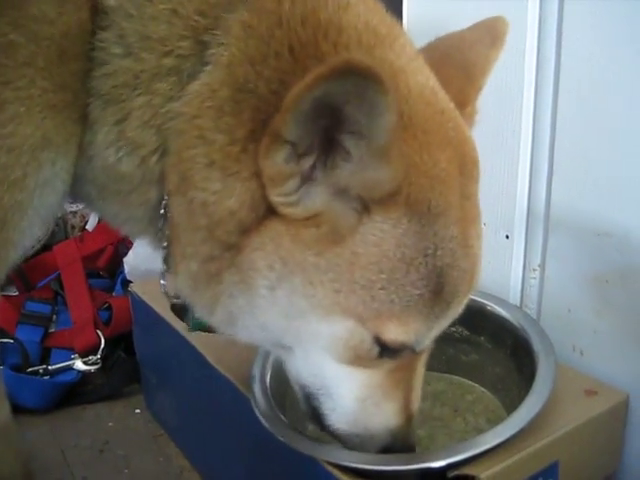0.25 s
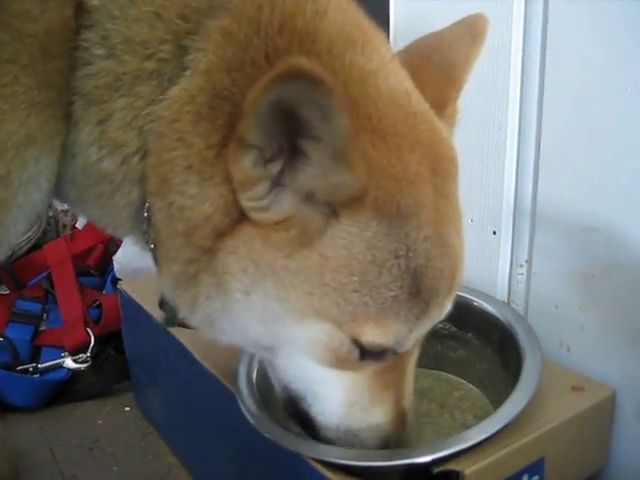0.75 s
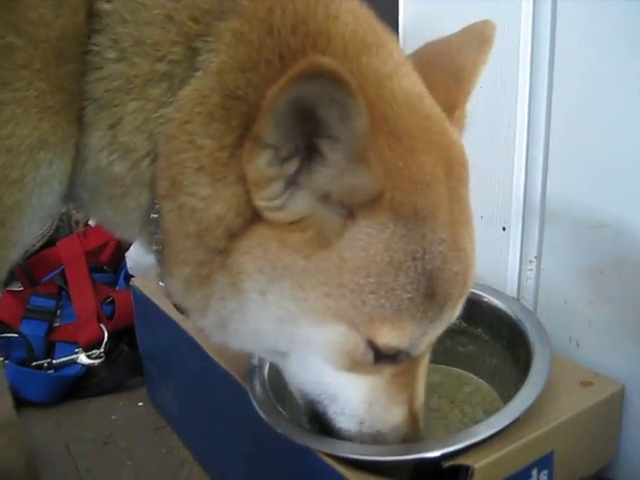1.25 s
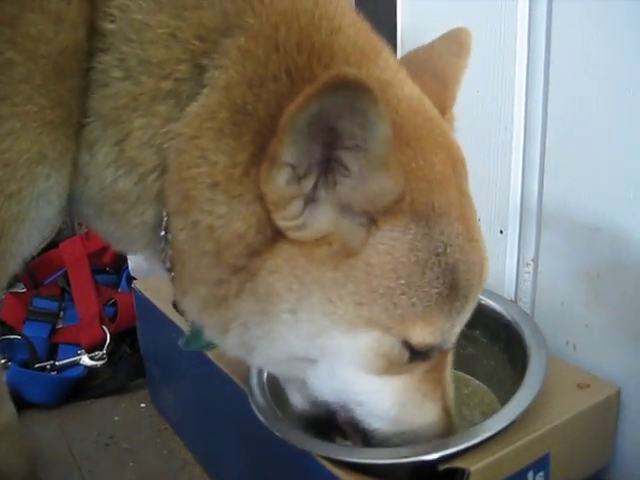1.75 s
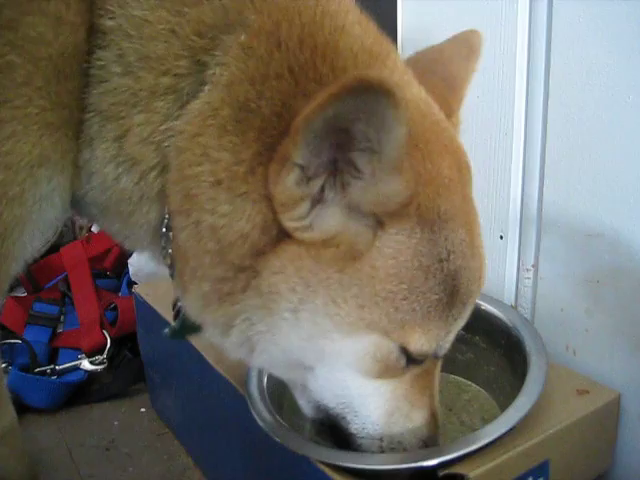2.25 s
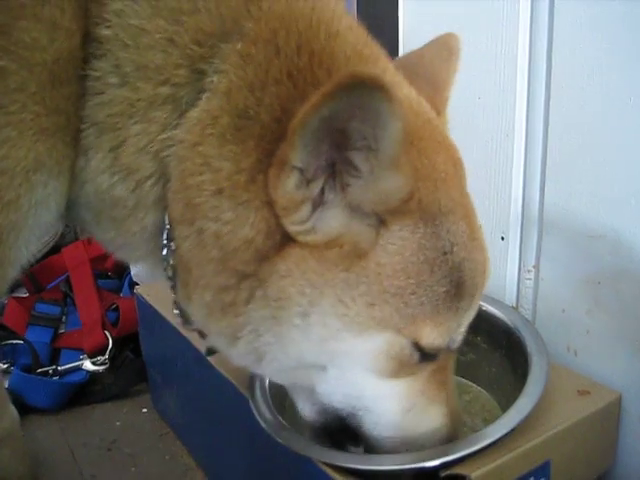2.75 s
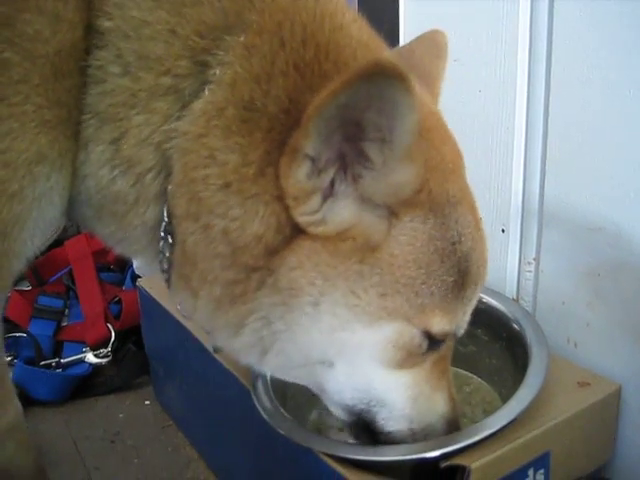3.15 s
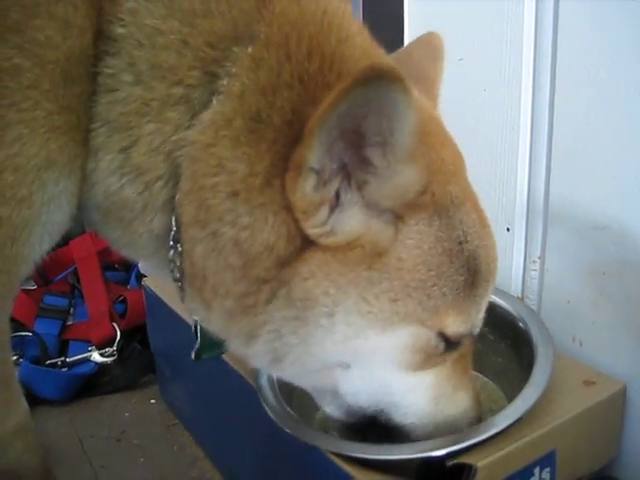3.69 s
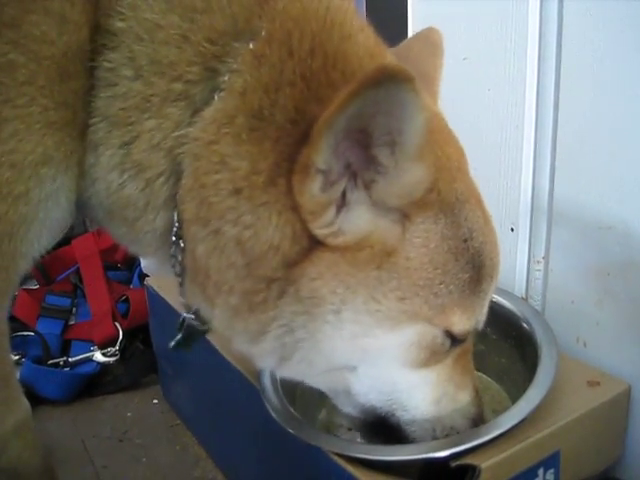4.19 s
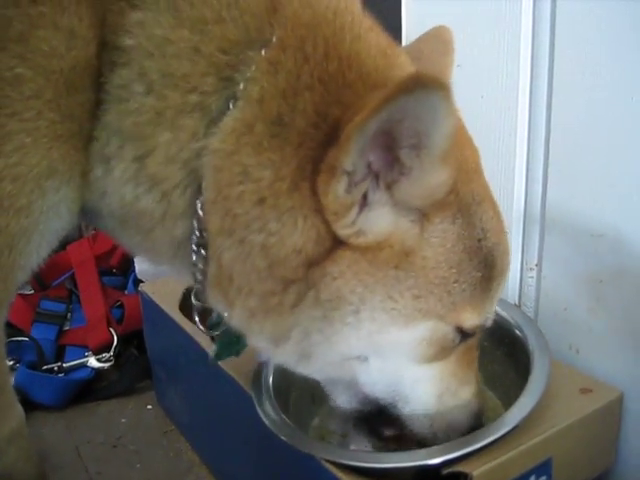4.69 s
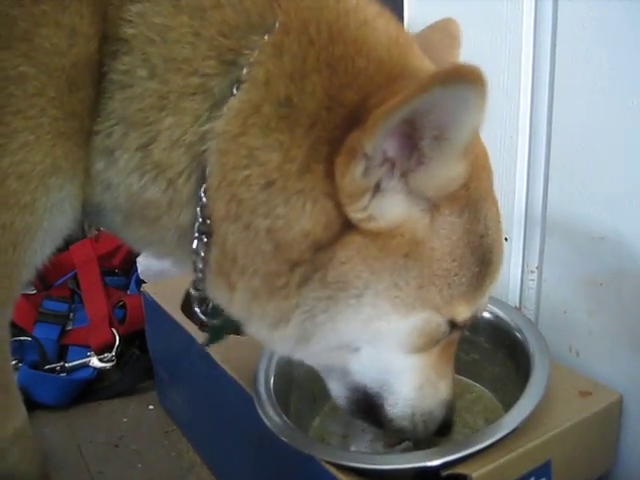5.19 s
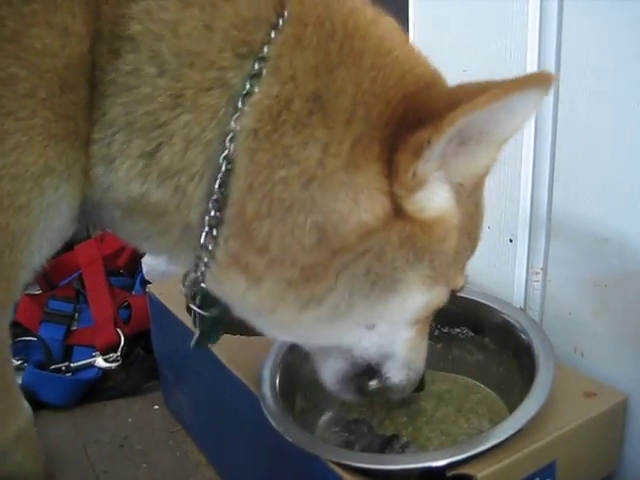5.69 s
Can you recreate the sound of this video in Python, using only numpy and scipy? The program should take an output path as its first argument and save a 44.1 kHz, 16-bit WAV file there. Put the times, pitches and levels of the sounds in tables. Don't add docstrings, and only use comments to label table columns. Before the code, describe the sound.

Steady wet lapping and sticky tongue smacks begin at once, with tiny bubbles crackling between them. High, thin tag clinks and chain snaps are busiest in the first couple of seconds and continue between laps. Soft muzzle knocks and dull bowl thuds sit low. Near the end the lapping thins to small sticky snaps and a last bright clink. Close, dry indoor sound with microphone hiss.

```python
import sys
import numpy as np
from scipy import signal
from scipy.fft import rfft, irfft
from scipy.io import wavfile
from scipy.ndimage import uniform_filter1d

SR = 44100
rng = np.random.default_rng(int(sys.argv[2]) if len(sys.argv) > 2 else 0)


def transcribe(signal):
    frames = np.atleast_2d(signal).T
    limited = np.clip(frames, -1, 1)
    pcm = np.round(limited * 32767).astype(np.int16)
    wavfile.write(sys.argv[1], SR, pcm)


def gain_from_decibels(decibels):
    exponent = np.asarray(decibels, float) / 20
    return 10 ** exponent


N = 261937


def rms_one(x):
    return x / np.sqrt(np.mean(x ** 2) + 1e-20)


def band(x, low_hz, high_hz):
    return signal.sosfilt(signal.butter(2, [low_hz, high_hz], "band", fs=SR, output="sos"), x)


def resonance(x, hz, width_hz):
    r = np.exp(-np.pi * width_hz / SR)
    feedback = [1, -2 * r * np.cos(2 * np.pi * hz / SR), r * r]
    return signal.lfilter(np.array([1, 0, -1]) * (1 - r * r) / 2, feedback, x)


def dying(t, t60, rise):
    return (1 - np.exp(-t / rise)) * gain_from_decibels(-60 * t / t60)


def seconds(length_s):
    return np.arange(int(length_s * SR)) / SR


def tone(hz, t):
    return np.sin(2 * np.pi * hz * t)


def add(out, s, x):
    at = min(max(round(s * SR), 0), len(out))
    out[at:at + len(x)] += x[:len(out) - at]


def grains(per_s, spread_db):
    sizes = gain_from_decibels(spread_db * np.minimum(rng.exponential(1, N), 4)) * rng.choice([-1, 1], N)
    return sizes * (rng.random(N) < per_s / SR) + 1e-18


def swarm(per_s, spread_db, low_hz, high_hz, cycles, count):
    born, dealt = grains(per_s, spread_db), rng.integers(0, count, N)
    pitches = np.geomspace(low_hz, high_hz, count)
    return rms_one(sum(resonance(born * (dealt == k), hz, hz / cycles) for k, hz in enumerate(pitches)))


def bursts(rows, gain_db, cycles, noisy):
    out, t = np.zeros(N), seconds(1 / 16)
    for s, db, hz in rows:
        rise, white = 0.00031 + 0.6 / hz, rng.standard_normal(len(t))
        colour = rms_one(resonance(resonance(white, hz, 0.3 * hz), hz, 0.3 * hz))
        wave = np.sin(2 * np.pi * hz * t + white[0]) + noisy * colour
        add(out, s - 1.3 * rise, gain_from_decibels(db + gain_db) * wave * dying(t, 0.0047 + cycles / hz, rise))
    return out


# (frequency [Hz], density [dB per Hz])
FLOOR_SPECTRUM = [(12, -33), (20, -7.5), (191, 3.5), (511, 0.5), (977, 2.5), (1330, -1.5), (5300, -13),
                  (7860, -16.5), (9050, -13), (12700, -17), (15500, -18), (16800, -47)]
# (frequency [Hz], rms level [dB])
HUM_LINES = [(59.5, -75), (120, -73.5), (990.5, -66)]


def room_floor():
    hz = np.fft.rfftfreq(N, 1 / SR) + 1
    corner_hz, density_db = np.transpose(FLOOR_SPECTRUM)
    shape = gain_from_decibels(np.interp(np.log(hz), np.log(corner_hz), density_db))
    hiss = rms_one(irfft(rfft(rng.standard_normal(N)) * shape, N))
    t = np.arange(N) / SR
    lines = sum(np.sqrt(2) * gain_from_decibels(db) * tone(line_hz, t) for line_hz, db in HUM_LINES)
    return gain_from_decibels(-54.5) * hiss + lines


# (time [s], peak level [dB], pitch [Hz], fall to half [ms])
TONGUE_POCKETS = [(0.1262, -27.5, 1920, 2.1), (0.2587, -28.5, 1800, 1.6), (0.5243, -22, 1690, 1.6),
                  (0.5281, -21.5, 1740, 1.4), (0.5343, -46, 1760, 1), (0.6054, -27.5, 1890, 1.8),
                  (0.6642, -27.5, 1660, 0.95), (0.9438, -29, 1880, 0.65), (0.9474, -31, 1860, 1.1),
                  (0.9609, -28.5, 1770, 1.7), (1.2838, -29, 1690, 0.83), (1.5514, -31.5, 2320, 1.1),
                  (1.5599, -28.5, 1600, 1.1), (1.6502, -30, 1830, 2), (1.8551, -20, 1850, 2.3),
                  (1.8811, -25.5, 1650, 0.66), (1.8845, -31.0, 1690, 1), (2.1679, -22, 1910, 1.9),
                  (2.1861, -27.5, 1670, 0.9), (2.4778, -26.5, 1800, 1.8), (2.4814, -38, 1710, 1),
                  (2.4946, -22, 1640, 1.2), (2.4984, -39, 1720, 0.7), (2.5124, -22, 1860, 0.85),
                  (2.516, -27, 1730, 0.91), (2.8679, -30, 2020, 0.55), (2.8752, -23.5, 1600, 0.85),
                  (2.8784, -39, 1920, 0.7), (2.8937, -23.5, 1900, 0.7), (2.9186, -33.5, 1850, 1.6),
                  (3.1726, -28.0, 1870, 1.7), (3.5011, -27.5, 1750, 1), (3.804, -23.5, 1690, 1.4),
                  (3.8127, -28.5, 1500, 0.6), (4.0919, -23, 2210, 0.49), (4.1029, -26.5, 1600, 0.94),
                  (4.1126, -26.5, 1760, 1.2), (4.431, -24.5, 1560, 0.8), (4.9343, -22.5, 1660, 1.6),
                  (4.9428, -34, 1780, 2.2), (5.2315, -24.5, 1730, 0.35), (5.4515, -29, 1910, 1)]
# (time [s], peak level [dB], pitch [Hz])
LIP_POCKETS = [(0.1227, -24, 3050), (0.1267, -34, 3260), (0.225, -25, 3280), (0.527, -36, 3190),
               (0.5313, -31, 3500), (0.536, -27, 3500), (0.6339, -15.5, 3190), (0.6476, -28, 3240),
               (0.6643, -24.5, 3440), (0.827, -22.5, 3340), (0.9474, -21, 3400), (1.2353, -20, 3360),
               (1.2387, -26.5, 2970), (1.2522, -28.5, 3230), (1.283, -25, 3150), (1.437, -27, 2800),
               (1.549, -30, 3280), (1.5551, -25.5, 3000), (1.8555, -22, 3500), (1.861, -38, 3400),
               (1.869, -28, 3130), (1.8809, -29, 3360), (2.1667, -29, 3350), (2.171, -34, 3400),
               (2.1866, -27, 3300), (2.394, -25, 3250), (2.495, -29.0, 2830), (2.5125, -29, 2670),
               (2.7598, -31, 2740), (2.874, -28, 3110), (2.8945, -41, 2980), (2.9185, -32.5, 3160),
               (2.9617, -27, 3370), (3.1743, -25, 3370), (3.473, -30, 3200), (3.476, -28, 3140),
               (3.4827, -30, 3090), (3.6817, -30, 3150), (4.0915, -38, 3160), (4.105, -30, 2800),
               (4.312, -31, 3140), (4.4308, -25, 3430), (4.4442, -33, 3440), (5.126, -28.5, 3180),
               (5.3449, -31, 3540)]
# (time [s], level [dB], pitch
# [Hz])
TIP_POCKETS = [(0.3177, -37, 5500), (0.5318, -21.5, 4260), (0.5606, -32, 6270), (0.6331, -23, 4890),
               (0.7443, -24.5, 6140), (0.824, -23.5, 5000), (0.832, -26.5, 5260), (0.9472, -24, 4980),
               (0.953, -33, 4800), (1.0175, -36, 5260), (1.2362, -27, 4030), (1.547, -24, 4230),
               (1.551, -26.5, 5020), (1.6599, -28, 5430), (1.7356, -29.5, 5400), (1.8546, -26, 4840),
               (1.8809, -16, 4120), (2.167, -27.5, 4240), (2.2837, -32, 4750), (2.3657, -26.5, 5120),
               (2.3958, -31, 4300), (2.496, -30, 4330), (2.5147, -30, 4260), (2.5966, -32.5, 5300),
               (2.761, -26, 4480), (2.8677, -28, 5400), (2.8757, -32, 4530), (2.891, -30, 4200),
               (3.1334, -27.5, 4200), (3.1716, -27.5, 5740), (3.6886, -25.5, 6300), (4.0916, -32, 5600),
               (4.3112, -13.5, 4470), (4.9211, -21, 5800), (5.347, -25, 4770)]
# (time [s], level [dB], pitch [Hz])
DEEP_POCKETS = [(0.6064, -31, 797), (0.6205, -41, 840), (0.6333, -37, 880), (1.1636, -31.5, 970),
                (1.4445, -32.5, 900), (2.4951, -36, 1050), (2.514, -44, 870), (2.8768, -34.5, 1200),
                (2.9622, -31, 950), (2.9705, -34.5, 970), (3.4743, -35.0, 820), (4.105, -29.5, 1190),
                (4.328, -34, 1080), (4.4316, -37, 1130), (4.4452, -38, 1040), (5.2319, -31, 1030),
                (5.246, -33, 1070), (5.452, -32, 970), (5.4647, -32.5, 900)]


def pops():
    unlisted = LIP_POCKETS + TIP_POCKETS + DEEP_POCKETS
    return TONGUE_POCKETS + [(s, db, hz, 0.8 + 300.0 / hz) for s, db, hz in unlisted]


def wetness(t60):
    stirred = np.zeros(N)
    for s, db, *_ in pops():
        stirred[min(max(round((s - 0.003) * SR), 0), N - 1)] += gain_from_decibels(db + 24) ** 0.6
    r = gain_from_decibels(-60 / (t60 * SR))
    return uniform_filter1d(signal.lfilter([1], [1, -r], stirred), size=200)


# (frequency [Hz], width [Hz], level [dB])
MOUTH_MODES = [(900, 3300, -11.5), (1850, 87, 9.5), (3250, 800, 2.5), (4300, 133, -4), (5010, 200, -3)]


def mouth(x):
    return sum(gain_from_decibels(db) * resonance(x, hz, width) for hz, width, db in MOUTH_MODES)


def lapping():
    bare = swarm(1100, 3.5, 900, 6800, cycles=12, count=16)
    crackle = rms_one(bare + mouth(bare))
    gurgle = swarm(600, 2.5, 620, 1500, cycles=7, count=8)
    threads = swarm(1300, 3.5, 5000, 15000, cycles=7, count=8)
    stray = swarm(250, 2.4, 2500, 15000, cycles=14, count=8)
    out = crackle * (gain_from_decibels(-44.0) * wetness(0.051) + gain_from_decibels(-58.5))
    out += gain_from_decibels(-55.5) * gurgle * wetness(0.14)
    out += gain_from_decibels(-44.0) * threads * wetness(0.0085)
    return out + gain_from_decibels(-62.0) * stray


# (time [s], level [dB], pitch [Hz])
MUZZLE_NUDGES = [(5.024, -47, 573), (0.2474, -49.5, 418), (0.282, -46.5, 294), (0.0089, -51, 534),
                 (0.7423, -50, 610), (1.5864, -50, 315), (2.0848, -51, 420), (2.8929, -47, 417),
                 (3.4766, -45, 283), (3.8123, -47.5, 307), (4.1271, -43, 315), (4.3736, -62, 494),
                 (4.9348, -41.5, 580), (5.0445, -47, 560)]


def nudges():
    return bursts(MUZZLE_NUDGES, 6.9, cycles=10.6, noisy=1.0)


# (time [s], peak level [dB], crack colour [Hz], ring level over peak [dB])
STRIKES = [(0.0255, -9.5, 14100, -23.5), (0.051, -16.5, 14800, -21), (0.3188, -8.5, 12200, -24),
           (0.3428, -16, 15200, -14), (0.414, -16, 15400, -18.5), (0.5002, -22, 14700, -24),
           (0.5603, -12.5, 13100, -14.5), (0.6794, -21, 13000, -15), (0.7005, -20, 12800, -22),
           (1.0173, -8, 14600, -19.5), (1.112, -16.5, 15100, -23), (1.363, -13.5, 14900, -29),
           (1.66, -10, 14700, -22.5), (1.6825, -11, 15200, -21), (2.039, -17, 16000, -15.5),
           (2.2822, -15.5, 12460, -20), (2.3649, -11, 14600, -19), (2.5964, -16.5, 12900, -24),
           (2.6622, -13.5, 14300, -17), (2.896, -17.5, 12600, -19), (3.3748, -20.5, 15500, -34),
           (3.6609, -17.5, 13700, -16.5), (3.9453, -20.5, 15600, -24), (3.9807, -14.5, 12100, -16),
           (4.2891, -11.5, 14900, -16), (4.5764, -22, 15500, -16), (4.91, -18.5, 14600, -26),
           (5.5537, -20, 12600, -17), (5.593, -19, 13300, -10.5), (5.8949, -23.5, 13700, -8.5)]
# (time [s], peak level [dB], crack colour [Hz])
LINKS = [(0.254, -25, 11000), (0.5282, -19, 12200), (0.746, -20, 9100), (0.7868, -21.5, 15000),
         (0.813, -22.5, 14600), (0.8306, -21.5, 12000), (0.9466, -13, 10500), (1.1426, -22.5, 14600),
         (1.26, -25, 12800), (1.4075, -18, 15300), (1.5504, -21.5, 10000), (1.735, -27, 11800),
         (1.8178, -19, 10700), (1.856, -19, 9400), (2.064, -16.5, 15000), (2.9345, -27, 10500),
         (2.9894, -19, 15000), (3.09, -21.5, 9200), (3.181, -25.5, 12800), (3.2925, -20.5, 17100),
         (3.8056, -27, 9800), (4.111, -21, 10100), (4.312, -27, 13500), (4.7204, -18, 9200),
         (5.008, -24, 10300), (5.0226, -15.5, 13400), (5.232, -28.5, 13000)]
# (time [s], peak level [dB])
BRUSHES = [(1.209, -27), (1.349, -27), (1.446, -24), (1.6495, -30), (1.7523, -22), (1.959, -25.5),
           (2.456, -25.5), (2.754, -26), (2.796, -28.5), (3.58, -29.5), (3.689, -23.5), (3.739, -30),
           (3.891, -23.5), (4.324, -39), (4.5286, -23), (4.7045, -26), (4.992, -24.5), (5.277, -17.5),
           (5.581, -32)]


def touches():
    link_ring_db, brush_hz, brush_ring_db = -30, 11000, -21
    links = [(*row, link_ring_db) for row in LINKS]
    return STRIKES + links + [(*row, brush_hz, brush_ring_db) for row in BRUSHES]


# (frequency [Hz], width [Hz], level [dB], t60 [s])
TAG_MODES = [(9200, 7400, -11, 0.14), (12150, 86, -17, 0.054), (12800, 56, -6.5, 0.051),
             (14600, 64, -8, 0.046), (15000, 200, -9, 0.043)]


def clinks():
    out, t = np.zeros(N), seconds(1 / 7)
    for s, db, hz, ring_db in touches():
        luck, white = rng.standard_normal(6), rng.standard_normal((2, len(t)))
        ring = np.zeros(len(t))
        for (mode_hz, width, level_db, t60), size_db in zip(TAG_MODES, luck):
            mode = rms_one(resonance(white[1], mode_hz, width)) + 2.7 * np.exp(-width / 240) * tone(mode_hz, t)
            ring += gain_from_decibels(level_db + size_db) * mode * dying(t, t60, 0.00056)
        crack = band(white[0], 6830, 21900) + gain_from_decibels(8.5) * resonance(white[0], hz, 870)
        crack += gain_from_decibels(-8.0) * band(white[0], 1020, 15600) + gain_from_decibels(-40.0) * band(white[0], 150, 1700)
        tail = dying(t, 0.0079, 0.00038) + gain_from_decibels(ring_db - 19.0) * dying(t, 0.013, 0.0018)
        rebound = gain_from_decibels(-16.5) * dying(t[:SR // 50], 0.019, 0.0011)
        add(tail, 0.0057 + 0.00049 * luck[5], rebound)
        crack = crack * tail / np.abs(crack * tail).max()
        add(out, s - 0.0003, gain_from_decibels(db) * (gain_from_decibels(ring_db + 3.0) * ring + gain_from_decibels(-2.5) * crack))
    return out


# (time [s], level [dB], colour [Hz])
FAINT_TICKS = [(0.0663, -39, 15000), (0.1177, -37, 15000), (2.0935, -41, 6360), (0.3337, -32, 12650),
               (0.6261, -39, 10600), (0.6336, -35, 12300), (0.7194, -35, 12800), (0.8261, -40, 10670),
               (0.9324, -45, 10670), (1.1379, -38, 9960), (1.1663, -42, 12800), (1.9042, -40, 15000),
               (1.9905, -42, 9100), (2.4759, -41, 15000), (2.5028, -46, 10600), (2.867, -41, 10600),
               (2.9648, -38, 10300), (3.085, -35, 8900), (3.1728, -42, 10670), (3.3843, -43, 10600),
               (5.1259, -35.5, 6450), (3.7864, -40, 10400), (3.9146, -39, 8950), (4.2, -38, 14800),
               (4.3257, -31, 12650), (4.629, -41, 15000), (4.9552, -33, 15000), (5.1623, -39.5, 10670),
               (5.3533, -40, 12800), (5.3608, -42.5, 10670), (5.5823, -31, 15000), (5.8956, -15, 15000),
               (5.9315, -39, 10670)]


def fine_ticks():
    return bursts(FAINT_TICKS, 5.2, cycles=30, noisy=1.0)


# (time [s], peak level [dB], colour [Hz])
THREAD_SNAPS = [
    (0.107, -31, 5630),
    (0.157, -26, 8700),
    (0.2624, -31, 11000),
    (4.1954, -31, 5370),
    (5.4316, -28.5, 5100),
    (5.7413, -34.5, 5240),
    (5.776, -30.5, 9200),
    (5.839, -24, 4670),
    (5.8526, -31, 11900),
    (5.8691, -34, 12800),
]


def snaps():
    out, t = np.zeros(N), seconds(1 / 50)
    for s, db, hz in THREAD_SNAPS:
        white = rng.standard_normal(len(t))
        tick = resonance(white, hz, 1300) + 0.62 * band(white, 1600, 16000)
        add(out, s, gain_from_decibels(db) * tick * dying(t, 0.0084, 0.00056))
    return out


# (time [s], level [dB], pitch [Hz])
FOOD_BUBBLES = [(0.1179, -34, 4120), (0.2461, -33, 3300), (0.5139, -28.5, 5270), (0.8149, -32, 5350),
                (0.8186, -41, 1600), (0.8439, -38.5, 2150), (0.9314, -32, 5640), (1.1544, -34, 5740),
                (1.1662, -35, 3290), (1.4532, -32, 1720), (1.4636, -35.5, 1420), (1.4694, -35.0, 3280),
                (1.5654, -35.5, 4250), (1.5739, -34.5, 3260), (1.7541, -35.0, 4750), (1.8948, -35.5, 1660),
                (2.0927, -36.5, 1590), (2.357, -31, 3120), (2.9354, -35, 5160), (3.0642, -34, 6370),
                (3.0771, -28.5, 4630), (3.0895, -33, 4200), (3.1842, -35.5, 3120), (3.1909, -32, 4870),
                (3.2176, -35.0, 3060), (3.2917, -34, 5800), (3.3556, -35, 3200), (3.3842, -33.5, 4700),
                (3.672, -35, 3000), (3.776, -33, 3400), (3.7811, -39, 4660), (3.7922, -38, 4170),
                (3.9921, -36, 4700), (4.131, -35, 1520), (4.322, -34, 2070), (4.4193, -35, 6200),
                (4.6945, -32, 6100), (4.7346, -32.5, 3310), (4.8988, -34.5, 6080), (4.9112, -38, 5850),
                (4.9163, -40, 1870), (5.0084, -35, 5540), (5.023, -32, 5140), (5.0262, -37, 2980),
                (5.1385, -36, 1750), (5.3351, -31.5, 3580), (5.3644, -33, 4620), (5.5801, -34, 6500),
                (5.8387, -45, 4600), (5.9353, -35, 2770)]


def bubbles():
    return bursts(FOOD_BUBBLES, 2.1, cycles=20.5, noisy=1.0)


def smacks():
    out, t = np.zeros(N), seconds(1 / 30)
    for s, db, hz, fall_ms in pops():
        luck, white = rng.random(2), rng.standard_normal(len(t))
        rise = 0.00034 + 0.9 / hz
        late = t - 2 * rise
        swell = (late / rise) ** 2 * 4.3
        fall = (np.abs(late) / (0.00088 * fall_ms)) ** 0.98
        shape = gain_from_decibels(-6 * np.where(late < 0, swell, fall))
        wave = np.sin(2 * np.pi * (hz * late * (1 + 2.7 * luck[0] * late) + luck[1]))
        splash = mouth(white * shape)
        sticky = resonance(resonance(white ** 3 / 4, hz, hz), hz, 0.5 * hz) * dying(t, 0.096, 0.0013)
        add(out, s - 2 * rise, gain_from_decibels(db + 0.5) * (wave * shape + gain_from_decibels(-5.0) * splash + gain_from_decibels(-10.5) * sticky))
    return out


# (time [s], level [dB], pitch [Hz])
PAUSE_BUBBLES = [(0.2354, -38, 1700), (0.2865, -39.5, 1520), (0.3071, -40, 960), (0.5, -35, 3100),
                 (0.5527, -32, 3250), (0.964, -37.0, 4960), (1.1411, -33, 5370), (1.4323, -33.5, 4480),
                 (1.9041, -44, 3210), (2.0937, -35, 3260), (2.108, -35, 1040), (2.1991, -36, 1740),
                 (2.378, -35, 2050), (2.5205, -32, 4100), (2.5412, -39, 1910), (2.5846, -37, 3860),
                 (2.6621, -44, 3170), (2.7808, -37, 1670), (2.9702, -33, 3330), (2.985, -39, 1000),
                 (3.076, -32.5, 2900), (3.0765, -34.5, 1930), (3.2083, -34.5, 1620), (3.7055, -37, 1230),
                 (3.7107, -37.0, 2100), (3.982, -31, 3220), (4.454, -34, 827), (4.5643, -39.5, 3550),
                 (4.653, -33.5, 3550), (4.653, -38, 1590), (4.819, -47, 740), (4.823, -43, 3500),
                 (4.8977, -38, 3560), (4.9999, -37, 3100), (5.027, -33, 1720), (5.3307, -33, 1440),
                 (5.6247, -35.5, 5260), (5.9345, -36.5, 990)]


def faint_bubbles():
    return bursts(PAUSE_BUBBLES, 2.8, cycles=15.8, noisy=1.0)


# (time [s], peak level [dB], pitch [Hz])
STAND_THUDS = [(0.3018, -42.5, 563), (0.3055, -43.5, 267), (1.852, -53.5, 270), (2.163, -46, 248),
               (2.291, -48.5, 434), (2.473, -49.5, 260), (2.915, -50.5, 264), (3.469, -50, 680),
               (4.331, -46.5, 465), (4.862, -49.5, 279), (5.123, -48, 260), (5.427, -48, 259)]


def thuds():
    out, t = np.zeros(N), seconds(1 / 10)
    for s, db, hz in STAND_THUDS:
        scuff = rms_one(band(rng.standard_normal(len(t)), 0.19 * hz, 1.9 * hz))
        add(out, s - 0.001, gain_from_decibels(db + 7.5) * (tone(hz, t) + 0.5 * scuff) * dying(t, 0.075, 0.003))
    return out


# (time [s], peak level [dB])
RIM_CLACKS = [
    (0.3205, -34),
    (0.3441, -27),
]


def clacks():
    out, t = np.zeros(N), np.arange(-40, 40) / SR
    half_width_s = 0.00006
    for s, db in RIM_CLACKS:
        add(out, s + t[0], -gain_from_decibels(db) * np.exp(-(t / half_width_s) ** 2))
    return out


# (time [s], level [dB], colour [Hz])
METAL_GLINTS = [
    (4.3118, -24, 6170),
    (1.6, -30, 12100),
    (2.1376, -43, 10200),
    (2.4948, -34.5, 9700),
    (4.3117, -22, 13800),
    (4.9213, -36, 10200),
    (0.3438, -12.5, 15070),
    (1.9, -41, 15300),
    (5.8961, -27, 14600),
]


def glints():
    return bursts(METAL_GLINTS, 7.3, cycles=30, noisy=0.35)


# (time [s], peak level [dB], t60 [s])
FREE_SWING = [
    (0.5606, -39, 0.5),
]
# (time [s], peak level [dB])
LARGE_TAG_RINGS = [
    (0.4145, -45.5),
    (1.017, -39.5),
    (1.3628, -48),
    (1.6591, -49),
    (2.896, -56),
    (2.9896, -45.5),
    (0.7005, -52),
    (5.892, -49),
]
# (time [s], peak level [dB])
SMALL_TAG_RINGS = [
    (0.414, -43),
    (0.5605, -44),
    (1.018, -41),
    (1.111, -41.5),
    (1.659, -41),
    (2.3663, -39),
    (2.6623, -54),
    (3.6616, -45),
    (4.2896, -44),
]


def tag_rings():
    out, t = np.zeros(N), seconds(1 / 5)
    large = FREE_SWING + [(*row, 0.06) for row in LARGE_TAG_RINGS]
    small = [(*row, 0.07) for row in SMALL_TAG_RINGS]
    for rows, hz in ((large, 4965), (small, 7350)):
        for s, db, t60 in rows:
            detune = 1 + 0.00038 * rng.standard_normal()
            waver = rms_one(band(rng.standard_normal(len(t)), 23, 130))
            fur_db = 900 * np.maximum(t - 0.044, 0)
            ring = tone(hz * detune, t) * gain_from_decibels(1.8 * waver - fur_db)
            fall = dying(t, max(t60, 0.01), 0.00021) + 1.34 * dying(t, 0.056, 0.00057)
            add(out, s, gain_from_decibels(db + 2.5) * ring * fall)
    return out


# (time [s], peak level [dB], pitch [Hz])
MOUTH_GULPS = [
    (0.604, -32.5, 834),
    (0.83, -43, 648),
    (1.138, -44.5, 680),
    (2.39, -40, 1230),
    (4.315, -39.5, 677),
    (5.137, -43.5, 828),
]


def gulps():
    out, t = np.zeros(N), seconds(1 / 10)
    for s, db, hz in MOUTH_GULPS:
        waver = rms_one(band(rng.standard_normal(len(t)), 23, 195))
        hum = np.sin(2 * np.pi * hz * t + 0.46 * waver)
        add(out, s, gain_from_decibels(db + 3.5 * waver) * hum * dying(t, 0.13, 0.001))
    return out


# (time [s], level [dB], pitch [Hz])
LINGERING = [
    (4.955, -59, 4965),
    (5.052, -54, 4965),
    (5.279, -48, 5000),
    (5.743, -54, 1794),
]


def lingering_hums():
    return bursts(LINGERING, 6.0, cycles=250, noisy=0.1)


def room(x):
    t = seconds(1 / 3)
    tail = rng.standard_normal(len(t)) * dying(t, 0.2, 0.00095)
    return gain_from_decibels(-17) * signal.fftconvolve(x, tail / np.sqrt(np.sum(tail ** 2)))[:N]


def scene():
    near = lapping() + nudges() + clinks() + fine_ticks() + snaps() + bubbles() + smacks()
    near += faint_bubbles() + thuds() + clacks() + glints() + tag_rings() + gulps() + lingering_hums()
    return (near + room(near) + room_floor())[None]


def top_cut(x):
    return signal.sosfilt(signal.butter(12, 16970, fs=SR, output="sos"), x)


def record(dry):
    notch_hz, notch_width_hz = 7910, 1400
    port = signal.lfilter(*signal.iirnotch(notch_hz, notch_hz / notch_width_hz, fs=SR), dry)
    port = 1.145 * port + 0.031 * dry
    kept = signal.sosfilt(signal.ellip(8, 0.5, 50, 15750, fs=SR, output="sos"), port)
    top = signal.sosfilt(signal.ellip(6, 0.5, 30, [15850, 16600], "band", fs=SR, output="sos"), port)
    attack = uniform_filter1d(top ** 2, size=256) > gain_from_decibels(-50) ** 2
    heard = kept + gain_from_decibels(-7) * top * attack
    return top_cut(heard)


dry = scene()
out = record(dry)
transcribe(out)
```